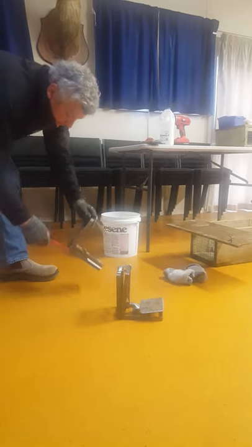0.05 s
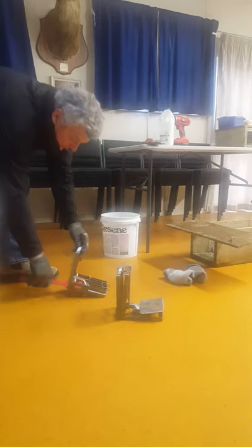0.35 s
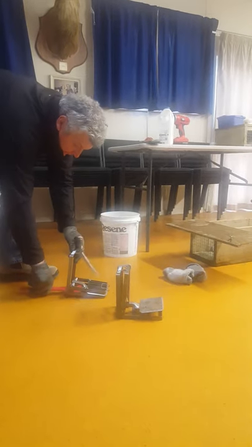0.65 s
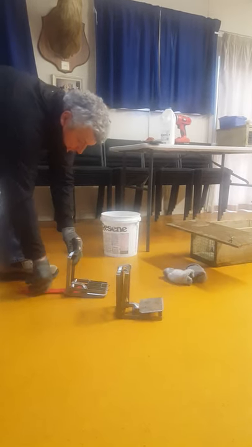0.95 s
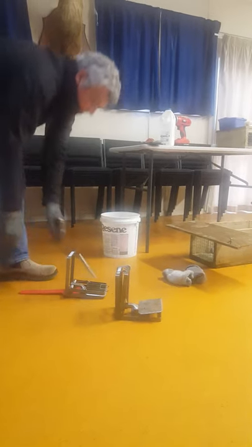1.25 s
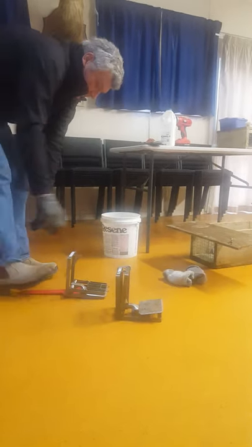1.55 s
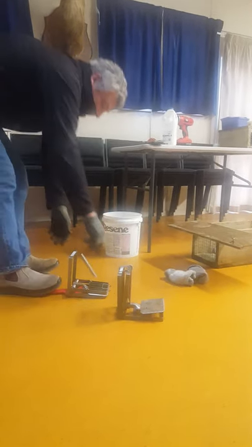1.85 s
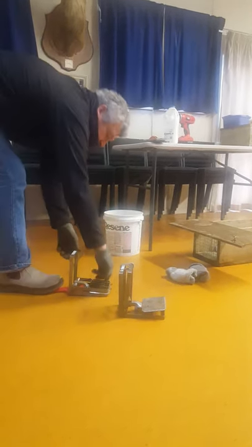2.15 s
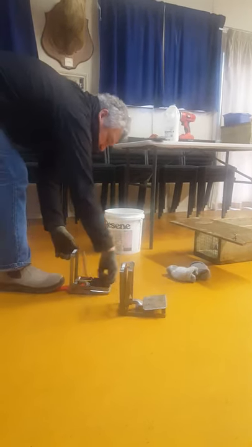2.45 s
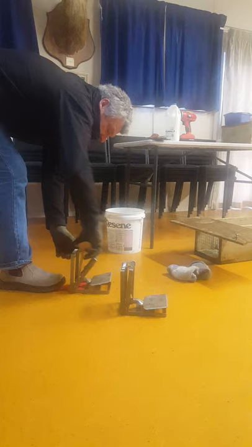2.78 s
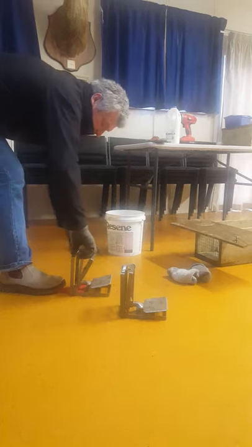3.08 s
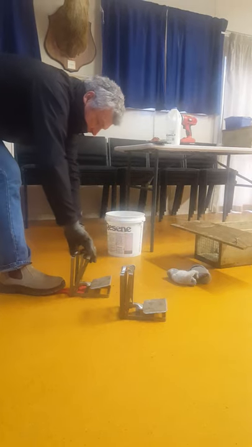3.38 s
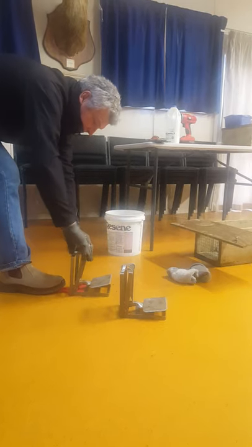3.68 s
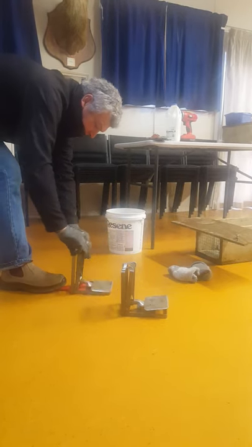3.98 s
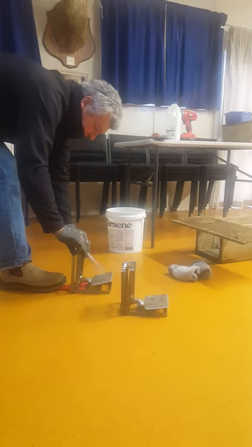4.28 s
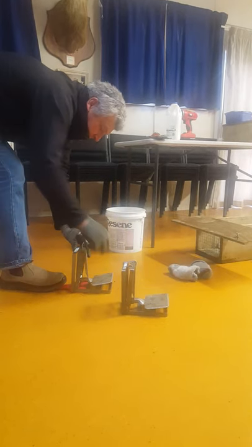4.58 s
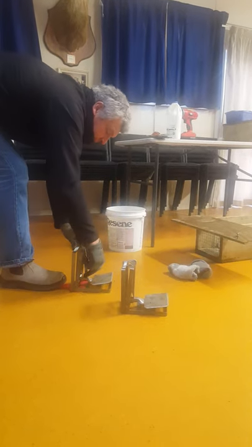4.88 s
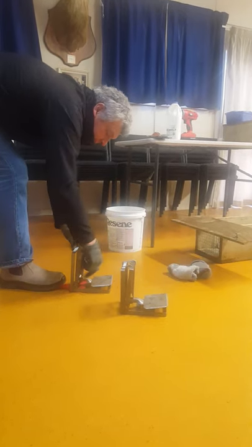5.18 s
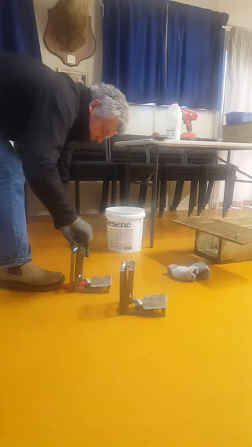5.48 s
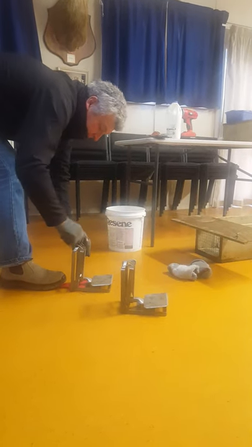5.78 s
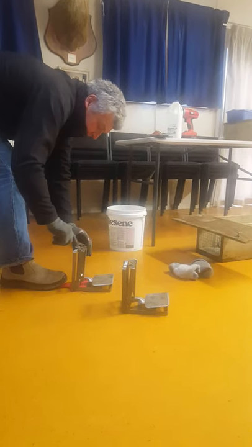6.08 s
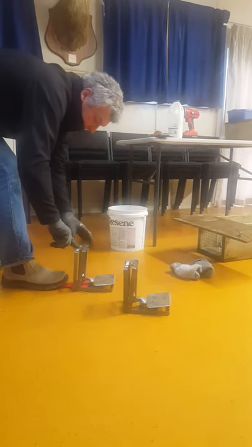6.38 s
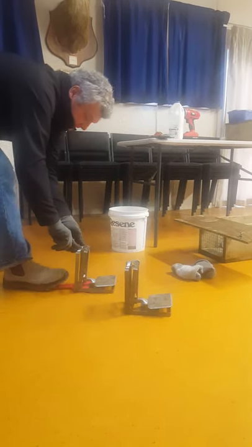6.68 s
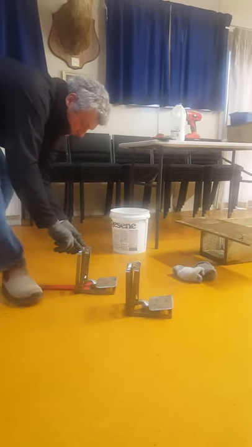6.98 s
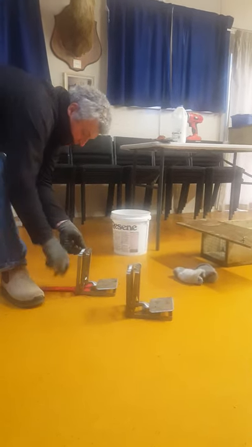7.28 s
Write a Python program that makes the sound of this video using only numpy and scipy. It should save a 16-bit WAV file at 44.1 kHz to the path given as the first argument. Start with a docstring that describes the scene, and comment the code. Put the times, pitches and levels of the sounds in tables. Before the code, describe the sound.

In a quiet, echoing hall, a steel trap clanks down on a springy floor a short way from the microphone. Boots thud softly and clothing rustles. Irregular, bright metal clacks follow as the trap is cocked, loudest just past the middle, where the trigger wire scrapes briefly and snaps into place. Each hit rings for a moment. The handling ends with a few faint clicks and a soft footstep.

```python
"""Setting a steel trap in a hall

A spring trap is put down on the floor, cocked with a lever under a boot, and latched.
Each knock makes the bars, plate and catch clack and ring, and the trigger wire rasps as it
slides into place. Boots thud on the springy floor, sleeves rustle, and the hall echoes every blow."""
import sys
import numpy as np
from scipy import signal
from scipy.fft import rfft, irfft
from scipy.io import wavfile
from scipy.ndimage import uniform_filter1d

SR = 44100
rng = np.random.default_rng(int(sys.argv[2]) if len(sys.argv) > 2 else 0)


def bounce(signal):
    """Save signal as a 16-bit WAV file at the path given by the first command-line argument."""
    frames = np.transpose(np.atleast_2d(signal))
    limited = np.clip(frames, -1, 1)
    pcm = np.round(limited * 32767).astype(np.int16)
    wavfile.write(sys.argv[1], SR, pcm)


N = 328104
TIME = np.arange(N) / SR
RING_S = TIME[:SR]   # the first second, for shaping one blow

# Steel hits steel or floor. Each row: start in seconds, kind of contact, strength in dB, brightness
# in dB per octave, floor thump in dB, ping pitch in Hz, ping level in dB.
CLACKS = [(0.0, "bar", -3, 0.66, -25, 10300, -13.5), (0.274, "frame", -23.5, 2, -33, 13300, -6),
          (.407, "frame", 3.5, -3.5, 3, 1747, -11), (.412, "frame", -1, 3.5, -13.5, 6050, -10.5),
          (.652, "frame", -8, 0.6, -12, 6000, -5), (.688, "frame", -23.5, -3, -13, 5800, -1.5),
          (.79, "frame", -20, 0.1, -17, 6000, -6), (.892, "frame", -18.5, 0.5, -27, 12600, -1.5),
          (0.986, "plate", 12.5, -3.5, 8.5, 1945, -9.5), (2.268, "wire", -20.5, -2, -26, 4280, -4),
          (2.405, "plate", 1, 0.5, -7, 7730, -2), (2.625, "bar", -1.2, 2.5, -12, 5090, -10),
          (2.826, "bar", -2, 2, -14, 10800, -9), (2.944, "wire", -17, -2, -23, 13390, -7),
          (3.589, "bar", -6.5, 0.7, -17.5, 10780, -5), (3.987, "plate", -6.5, -1, -16, 2970, -12),
          (4.008, "bar", -11, 0.5, -20.5, 2940, -17), (4.042, "plate", 10.5, 0.04, 4.5, 2150, -14.5),
          (4.133, "bar", 14, 3, -4.5, 9990, -12), (4.41, "wire", 9.5, 2, -10, 4670, -18),
          (5.03, "wire", 9, 0.2, -14.5, 2026, -20), (5.735, "wire", -8, 1.5, -14, 11050, -7),
          (6.321, "wire", -24, -0.5, -20, 8120, -4), (6.836, "wire", -35.5, -3, -36, 9980, -22),
          (7.135, "plate", -14, -0.2, -20.5, 7970, -1)]
# A blow has five ranges: thump, knock, clack, clink, sizzle. Each row: low edge, high edge, in Hz.
RANGES_HZ = [(50, 300), (300, 1100), (1100, 2400), (2400, 7000), (9000, 16000)]
# Each kind of contact: levels from knock to sizzle, then the ring of frame, bar and wire, all in dB.
CONTACTS = {"frame": ((-7, -5, .5, -3), (1.6, -16.5, -18.5)), "bar": ((-6, -1.5, -0.6, -4.5),
            (-17, -14, -17)), "plate": ((-5, 1.5, -1.5, -4.5), (-6, -15, -22.5)),
            "wire": ((-7.5, 0, -3.5, -3.5), (-30, -20, -13))}
# The natural tones of the frame, the spring-loaded bar and the trigger wire.
# Each row: pitch in Hz, level in dB, seconds to fade by 60 dB (called t60).
FRAME_TONES = [(1078,-15.5,0.19),(1800,-21,.1),(2250,-15,.25),(2710,-7.5,0.056),(3060,-16,.22),(4060,-17.5,0.25),(6029,-6.5,0.2),(6880,-16,0.23),(8716,-11.5,0.23),(9970,-6.5,0.26),(10600,-6,0.19),(10920,1,0.071),(11940,-8,0.2),(12640,-5,0.24)]
BAR_TONES = [(665,-11.5,0.055),(1380,-7,0.3),(2680,-13.5,0.55),(3045,-9,0.22),(3100,-11.5,0.36),(4000,-11.5,0.4),(4700,-15,0.3),(4730,-16,0.32),(5920,-9.5,.2),(6040,-8,0.48),(5860,-2.5,0.42),(8000,-10.5,0.24),(10110,3.5,0.1),(10900,-3,.2),(10930,3,0.21),(11900,-6,.25),(13000,-11,.25),(14115,-5.5,0.16)]
WIRE_TONES = [(664.5,-4.5,.3),(1525,-3.5,0.27),(2035,1,0.075),(2050,-11,0.2),(2236,-9.5,0.28),(2650,-11,0.33),(2930,-13,0.14),(4930,-15,0.27),(8400,-9.5,0.34),(10100,-7.5,0.23),(11800,-7,.2),(11900,-9,0.11)]
# Tones that linger after a blow. Each row: start in seconds, pitch in Hz, level in dB, t60 in seconds.
HUMS = [(0.0,592,-38,0.15),(0.411,65,-28.5,0.45),(0.411,2702,-23,.24),(.413,6030,-32,0.24),(.688,67,-38,0.3),(0.986,260.2,-22.5,0.46),(2.539,250.6,-33,0.17),(4.046,161.1,-27,0.46),(4.132,458.6,-33.5,0.94),(4.135,6037,-29,.3),(4.41,2618,-35,0.65),(5.029,151.6,-34.5,0.26),(5.738,72,-42,0.36),(7.057,150,-32.5,0.078)]
# The tone colour of steel, floor, cloth and boots. Each row: frequency in Hz, level in dB.
STEEL_COLOUR = [(35,-11.5),(65,0),(100,-3),(160,2.5),(240,-1.5),(350,-2.5),(470,-4),(650,0),(850,0),(1080,-1.5),(1300,4.5),(1950,3),(2450,0),(3000,-0.5),(3600,-5),(4600,-5.5),(5900,-8.5),(7000,-7),(11000,-7),(15500,-9.5)]
RUMBLE_COLOUR = [(25,0.5),(45,0),(70,7.5),(105,1.5),(170,-6.5),(270,-10),(370,-20.5),(600,-21.5),(1200,-39)]
RUSTLE_COLOUR = [(150,-6.5),(300,2.5),(600,-3),(900,-4),(1700,-2.5),(4000,-16),(9400,-22),(14000,-28),(16000,-26)]
BOOT_COLOUR = [(30,-8),(70,-6.5),(140,2),(230,-7.5),(400,-8.5),(900,-7),(2000,-19.5),(4000,-49),(15000,-50)]
# How long the hall rings. Each row: frequency in Hz, t60 in seconds.
HALL_T60 = [(60,0.22),(150,0.66),(400,0.65),(1000,0.56),(2000,0.59),(5000,0.51),(9000,0.45),(15000,0.35)]
# How alike left and right sound. Each row: frequency in Hz, likeness from 0 to 1.
LIKENESS = [(60,.97),(200,.9),(400,.72),(800,.3),(1600,.05),(8000,.02)]
# The first echoes. Each row: delay in seconds, level in dB, extra delay on the left in seconds.
ECHOES = [(.0032,-9,.00009),(.012,-13,-.00015),(.023,-12,.00032),(.030,-8,.0001),(.048,-13,.00032)]
# Swells of low rumble and rustle.
# Each row: midpoint in seconds, length in seconds, rumble in dB, rustle in dB.
SWELLS = [(0.733, 0.23, -55, -53), (1.358, 0.59, -62.5, -57.5), (2.172, 0.13, -43.5, -50),
          (2.318, 0.26, -48, -57.5), (2.485, 0.13, -53, -44.5), (2.84, 0.29, -53.5, -54),
          (3.324, 0.2, -56.5, -61.5), (3.743, 0.41, -52, -65.5), (5.16, 0.22, -51, -69),
          (6.567, 0.36, -67, -65.5), (7.027, 0.22, -54.5, -59.5), (7.41, .12, -57, -59.5)]
# Footsteps. Each row: start in seconds, strength in dB, brightness in dB per octave, thump in dB.
STEPS = [(1.446, -38, -6.5, -15.5), (1.657, -29.5, -10.5, -4.5), (1.769, -47.5, -13.5, -12.5),
         (2.098, -16.5, -6.5, -4.5), (2.565, -35, -7, -16.5), (7.024, -35.5, -9.5, -11),
         (7.047, -29, -10, -8)]
# A rubber sole's levels of knock, clack, clink and sizzle, in dB.
SOLE_DB = (-9, -1.3, -2, -23)
# The trigger wire slides. Each row: time of the hardest rub in seconds, level in dB.
SLIDES = [(2.624, -44), (3.99, -31), (4.992, -30.5)]
# The tone colour of two microphone openings. Each row: frequency in Hz, left in dB, right in dB.
MIC_COLOUR = [(197,-0.07,-1.3),(930,0.5,0.5),(1900,-1,2.5),(3340,4.5,4),(5840,5.5,1.5),(8550,-2,0),(9300,-4.5,1),(9740,-16,2),(10285,-19,10),(10400,-12,6.5),(12290,-6,6),(14300,-3,8),(15100,3,-10)]


def from_db(db):
    """Turn decibels into a gain."""
    return 10 ** (np.asarray(db) / 20)


def unit(x):
    """Scale a sound to an average energy of one per channel."""
    return x / np.sqrt(np.mean(np.sum(x ** 2, axis=-1)) + 1e-20)


def at_hz(points, hz, column=1):
    """Look up a frequency in a table, gliding between its rows."""
    table = np.array(points)
    return np.interp(np.log(np.maximum(hz, 1)), np.log(table[:, 0]), table[:, column])


def colour(x, points, column=1, size=4096):
    """Make each frequency louder or softer as a table says."""
    gains = from_db(at_hz(points, np.fft.rfftfreq(size, 1 / SR), column))
    cepstrum = irfft(np.log(gains))
    # fold it so that the filter never sounds ahead of the blow
    cepstrum[1:size // 2] *= 2
    cepstrum[size // 2 + 1:] = 0
    return signal.fftconvolve(x, irfft(np.exp(rfft(cepstrum))))[:len(x)]


def fade(t60):
    """A one-second curve that drops 60 dB every t60 seconds."""
    return np.exp(-np.log(1000) * RING_S / t60)


def burst(t60):
    """A crowd of short-lived tones, made as fading noise."""
    return unit(rng.standard_normal(SR) * fade(t60))


def add(track, s, sound):
    """Mix a sound in at s seconds."""
    start = round(s * SR)
    track[start:start + len(sound)] += sound[:N - start]


def balance(blow, shares_db, strength_db, brightness_db, thump_db, pivot_hz=3000):
    """The floor takes the thump; strength sets the level of the upper ranges and brightness tilts them."""
    centres_hz = np.sqrt(np.prod(RANGES_HZ, axis=1))
    octaves = np.log2(centres_hz[1:] / pivot_hz)
    wanted_db = np.r_[thump_db, strength_db + np.array(shares_db) + brightness_db * octaves]
    power = 2 * abs(rfft(blow)) ** 2 / SR   # one value per Hz
    tilt = np.array([(hz, 0) for hz in centres_hz])
    for _ in range(3):   # each pass comes closer to the wanted levels
        tilted = power * from_db(at_hz(tilt, np.arange(len(power)))) ** 2
        tilt[:, 1] += wanted_db - 10 * np.log10([tilted[lo:hi].sum() for lo, hi in RANGES_HZ])
    return colour(blow, tilt)


def boards(t60, cutoff_hz, give_s):
    """The springy floor gives under a blow and booms a moment later."""
    swing = unit(burst(t60) * (1 - np.exp(-RING_S / give_s)))
    return signal.sosfilt(signal.butter(2, cutoff_hz, fs=SR, output="sos"), swing)


def clatter(t60, count=110):
    """Plate and bars have many weaker tones; each blow wakes a different set."""
    spectrum = np.zeros(SR // 2 + 1, complex)
    hz = (400 + 15300 * rng.random(count) ** 1.3).astype(int)
    spectrum[hz] = rng.standard_normal(count) + 1j * rng.standard_normal(count)
    return unit(irfft(spectrum, SR) * fade(t60))


def ping(hz, edge_ratio=1.04, t60=.12):
    """The struck spot rings with a tight cluster of tones."""
    band = signal.butter(1, [hz / edge_ratio, hz * edge_ratio], "band", fs=SR, output="sos")
    return unit(signal.sosfilt(band, signal.sosfilt(band, burst(t60))))


def ring(tones, spread_db, detune):
    """A blow wakes each tone by a different amount; grip and spring load shift the pitches a little."""
    out = np.zeros(SR)
    for size, shift, sign, (hz, db, t60) in zip(*rng.standard_normal((3, len(tones))), tones):
        wave = np.sin(2 * np.pi * hz * (1 + detune * shift) * RING_S)
        out += np.sign(sign) * from_db(db + spread_db * size) * fade(t60) * wave
    return unit(out)


def trap(push_hz=1800):
    """Each contact pushes and cracks, the floor booms, and the steel parts clatter and ring."""
    out = np.zeros(N)
    soften = signal.butter(2, push_hz, fs=SR, output="sos")
    push = from_db(-9) * unit(signal.sosfilt(soften, signal.unit_impulse(SR) + 1e-18))
    for s, contact, strength_db, brightness_db, thump_db, ping_hz, ping_db in CLACKS:
        shares_db, rings_db = CONTACTS[contact]
        crack = burst(t60=0.025) + from_db(-5) * burst(t60=0.066)
        boom = from_db(8) * boards(t60=0.13, cutoff_hz=188, give_s=.04)
        blow = push + crack + boom
        blow += from_db(-10.5) * clatter(t60=.19)
        blow += from_db(ping_db) * ping(ping_hz)
        for tones, db in zip((FRAME_TONES, BAR_TONES, WIRE_TONES), rings_db):
            blow += from_db(db) * ring(tones, spread_db=1.5, detune=0.0038)
        blow = colour(blow, STEEL_COLOUR)
        add(out, s, balance(blow, shares_db, strength_db, brightness_db, thump_db))
    return out


def hums():
    """Struck boards, frame and coil spring sing on, each hum one pure fading tone."""
    out = np.zeros(N)
    for s, hz, db, t60 in HUMS:
        add(out, s, from_db(db) * fade(t60) * np.sin(2 * np.pi * hz * RING_S))
    return out


def diffuse(size):
    """Noise from all around: left and right are alike in the bass, unrelated in the treble."""
    alike = at_hz(LIKENESS, np.fft.rfftfreq(size, 1 / SR))
    mid, side = rfft(rng.standard_normal((2, size)))
    return irfft(np.sqrt(1 + alike) * mid + np.sqrt(1 - alike) * side * [[1], [-1]], size)


def hall(x, direct_db, build_s=0.0026, smooth_hz=90, left_lag_s=.00009):
    """Sound arrives directly, then as a few echoes and a wash that fades at each pitch's own pace."""
    hz, s, cells = signal.stft(diffuse(SR), SR, nperseg=256)
    decay = from_db(-60 * s / at_hz(HALL_T60, hz)[:, None])
    tail = signal.istft(cells * decay, SR)[1][:, :SR]
    response = unit(tail * (1 - np.exp(-RING_S / build_s)))
    direct = (0.0016, 0.0054, left_lag_s)   # laid out like a row of ECHOES
    for delay, db, lag in [direct, *ECHOES]:
        response[0, round((delay + lag) * SR)] += from_db(direct_db + db)
        response[1, round(delay * SR)] += from_db(direct_db + db)
    # a large hall favours no pitch, so even out the broad peaks and dips
    power = uniform_filter1d(np.mean(abs(rfft(response)) ** 2, axis=0), smooth_hz)
    even = np.column_stack([np.arange(len(power)) + 1, -10 * np.log10(power)])
    response = np.array([colour(side, even) for side in response])
    return signal.fftconvolve(x[None], unit(response), axes=1)[:, :N]


def rumble_and_rustle(quiet_db=(-60, -61), calming_db_per_s=0.99):
    """Swells over a sinking hush: weight shifts, sleeves brush, or the floor booms after a blow."""
    power = from_db(np.array(quiet_db)[:, None] - calming_db_per_s * TIME) ** 2
    for s, length, *levels_db in SWELLS:
        swell = np.exp(-2 * (2 * (TIME - s) / length) ** 2)
        power += from_db(levels_db)[:, None] ** 2 * swell
    out = np.zeros((2, N))
    for level, spectrum in zip(np.sqrt(power), (RUMBLE_COLOUR, RUSTLE_COLOUR)):
        noise = np.array([colour(side, spectrum) for side in diffuse(N)])
        out += level * unit(noise) * np.sqrt(N)
    return out


def boots():
    """The heel slaps down; the boards give and boom a moment later."""
    out = np.zeros(N)
    for s, strength_db, brightness_db, thump_db in STEPS:
        slap = burst(t60=0.012)
        boom = from_db(7) * boards(t60=0.12, cutoff_hz=400, give_s=0.0046)
        step = colour(slap + boom, BOOT_COLOUR)
        add(out, s, balance(step, SOLE_DB, strength_db, brightness_db, thump_db))
    return out


def wire_slide(slips_per_s=1500, swell_db_per_s=754.5, ease_db_per_s=795):
    """The wire rasps over steel in many tiny slips, swelling and easing off before it catches."""
    slips = (rng.random(N) < slips_per_s / SR) * rng.standard_normal(N)
    steel = burst(t60=.02) + from_db(-15) * ring(WIRE_TONES, spread_db=-2.0, detune=0.03)
    rasp = colour(signal.fftconvolve(slips, steel)[:N], STEEL_COLOUR)
    pressure = np.zeros(N)
    for s, db in SLIDES:
        pressure += from_db(db - np.maximum(swell_db_per_s * (s - TIME), ease_db_per_s * (TIME - s)))
    return pressure * unit(rasp) * np.sqrt(N)


def scene():
    """The trap fills the hall; footsteps come more directly, through the floor."""
    steel = trap() + hums() + wire_slide()
    return hall(steel, direct_db=-5.5) + hall(boots(), direct_db=3.5) + rumble_and_rustle()


def record(dry, ceiling=.92, cutoff_hz=15950):
    """Each microphone opening colours its side; loud peaks are rounded and the top treble is cut."""
    heard = np.array([colour(dry[0], MIC_COLOUR, column=1), colour(dry[1], MIC_COLOUR, column=2)])
    rounded = heard / (1 + (heard / ceiling) ** 6) ** (1 / 6)
    return signal.sosfilt(signal.ellip(10, .2, 80, cutoff_hz, fs=SR, output="sos"), rounded)


dry = scene()
out = record(dry)
bounce(out)
```